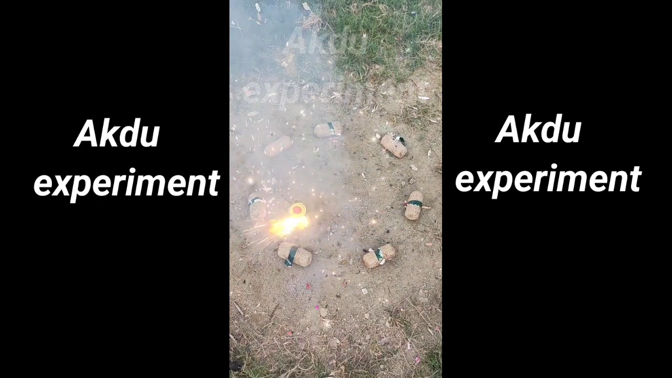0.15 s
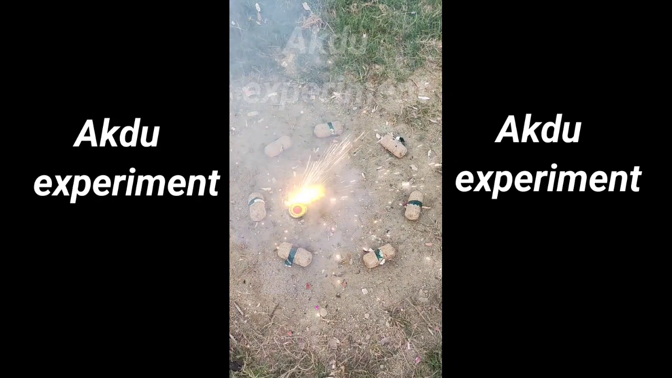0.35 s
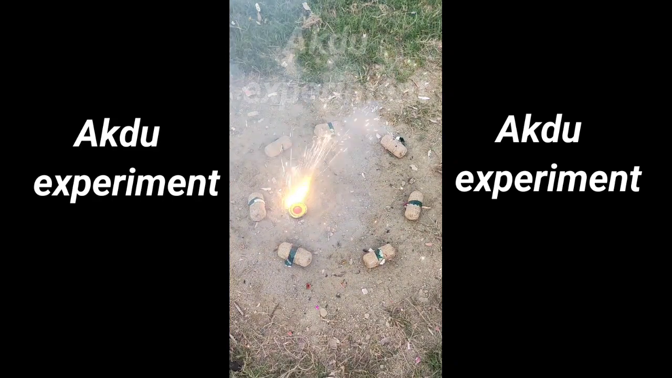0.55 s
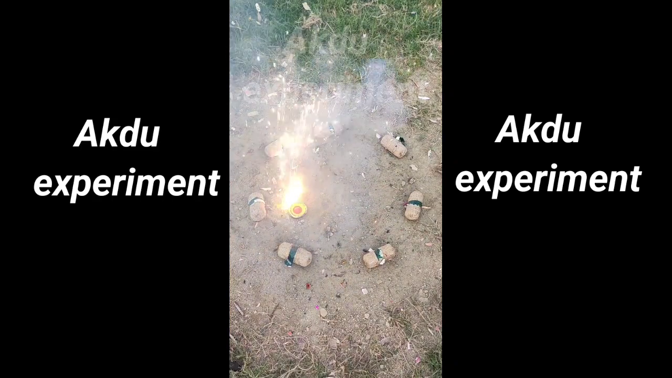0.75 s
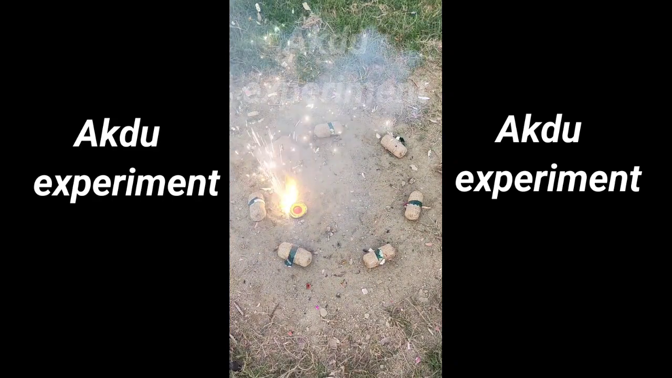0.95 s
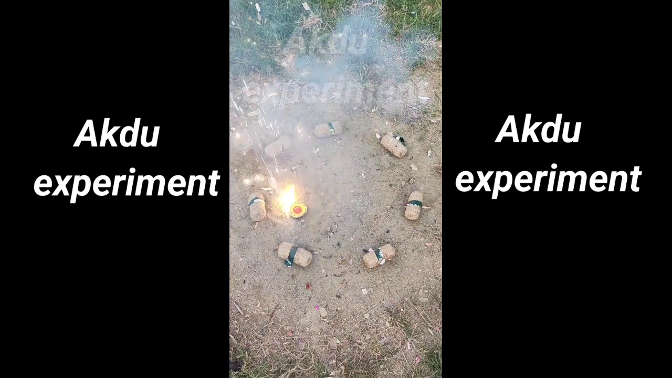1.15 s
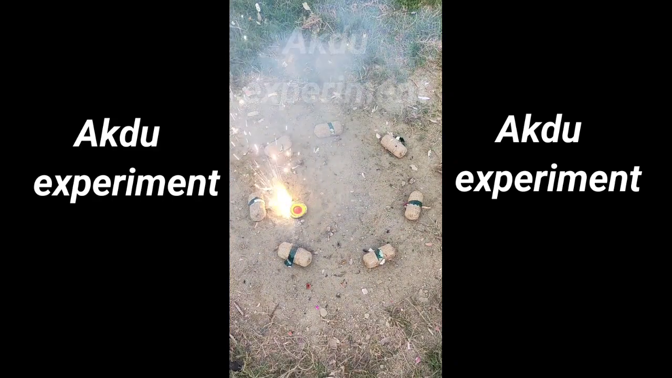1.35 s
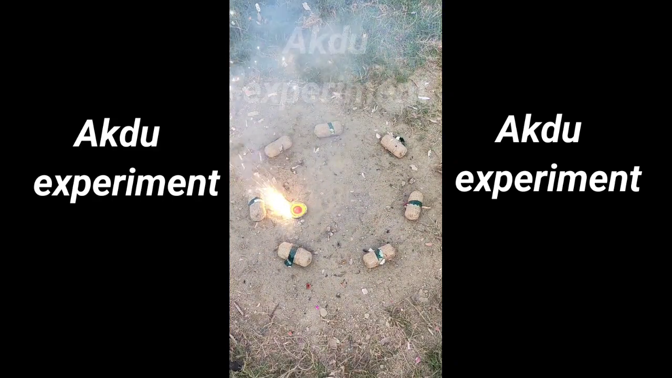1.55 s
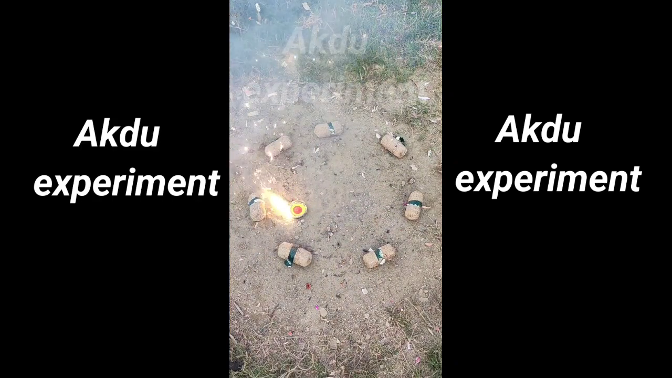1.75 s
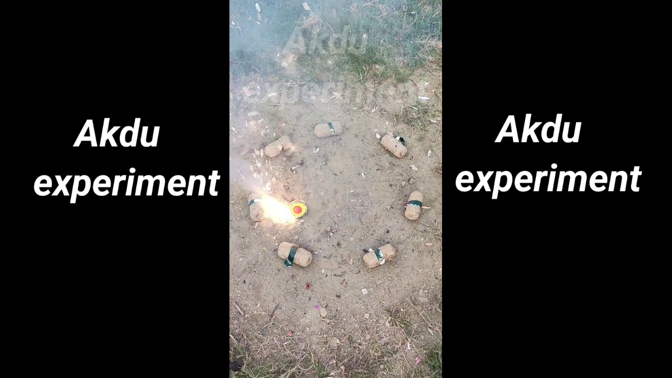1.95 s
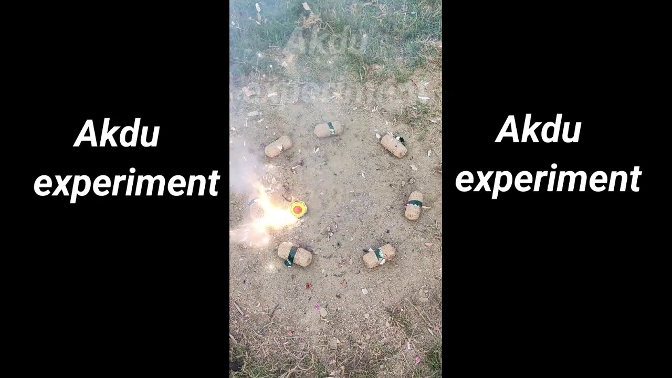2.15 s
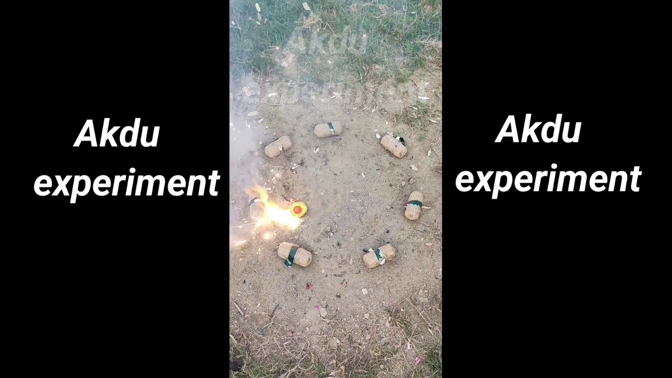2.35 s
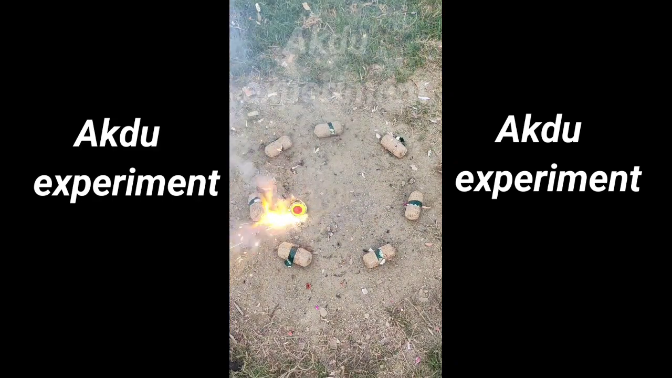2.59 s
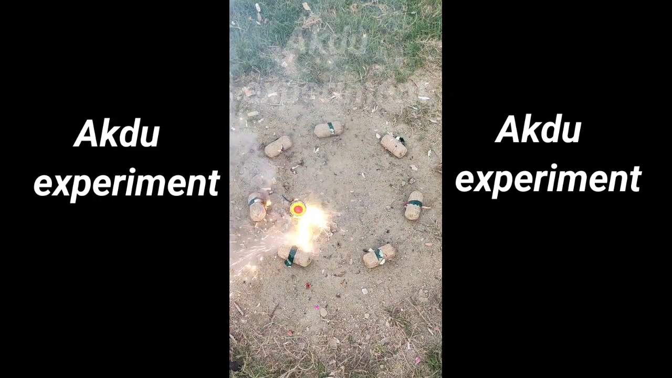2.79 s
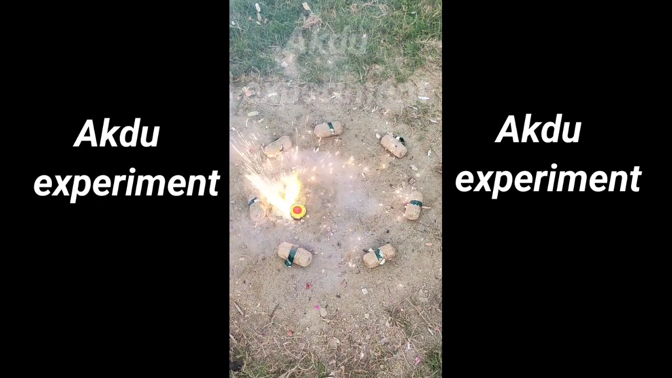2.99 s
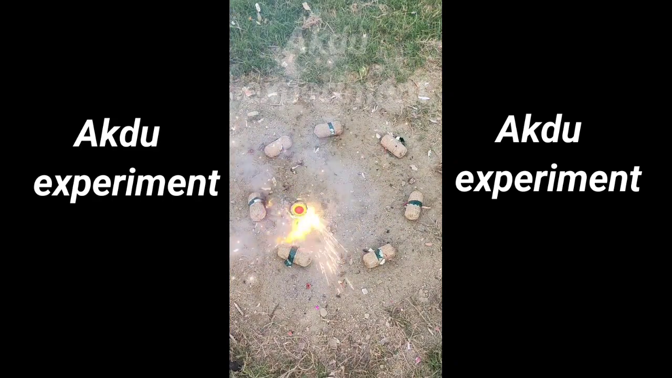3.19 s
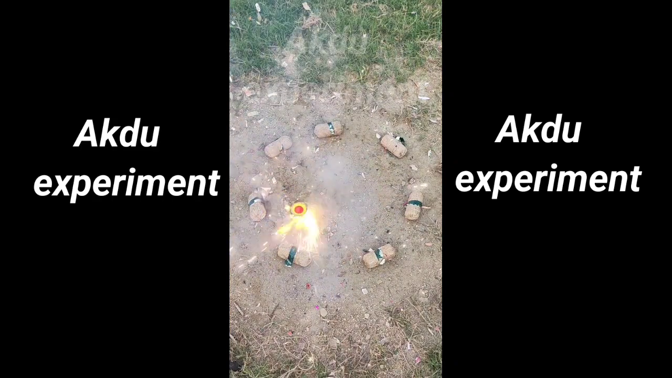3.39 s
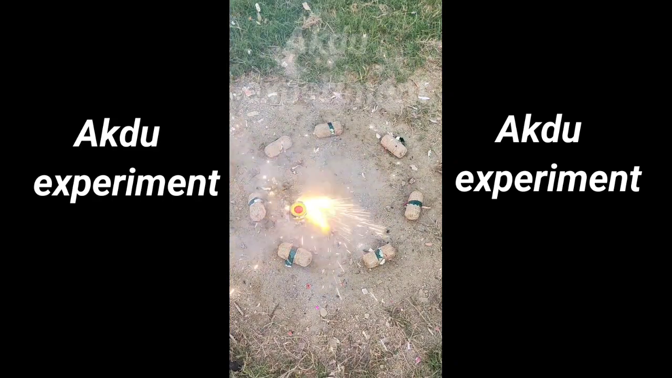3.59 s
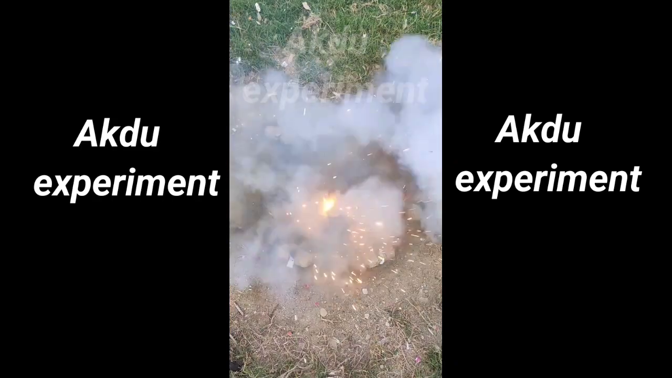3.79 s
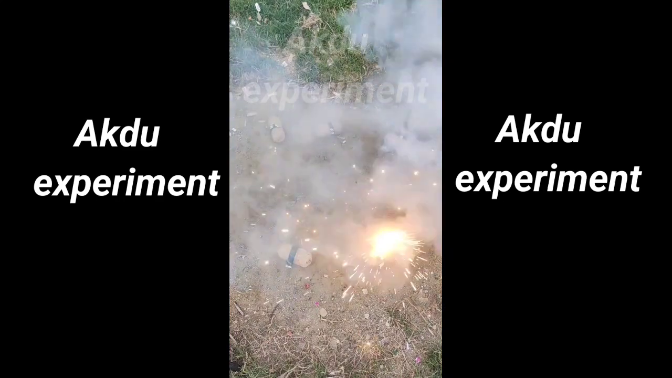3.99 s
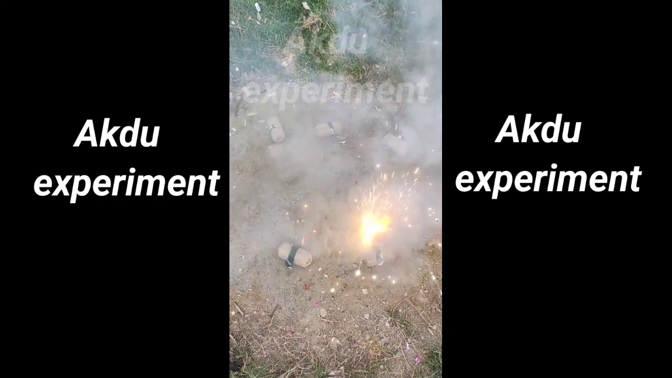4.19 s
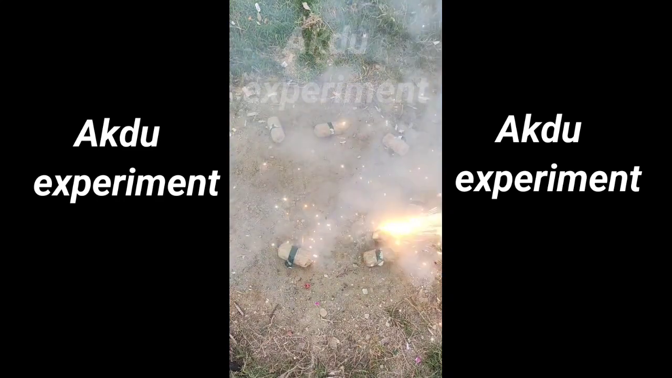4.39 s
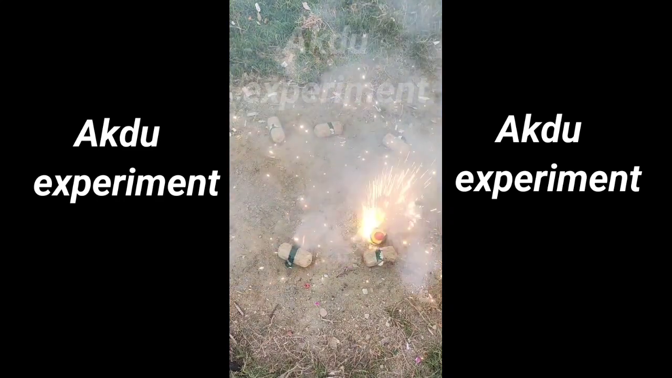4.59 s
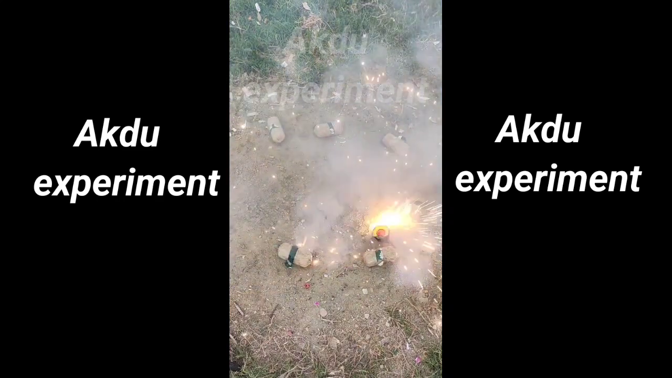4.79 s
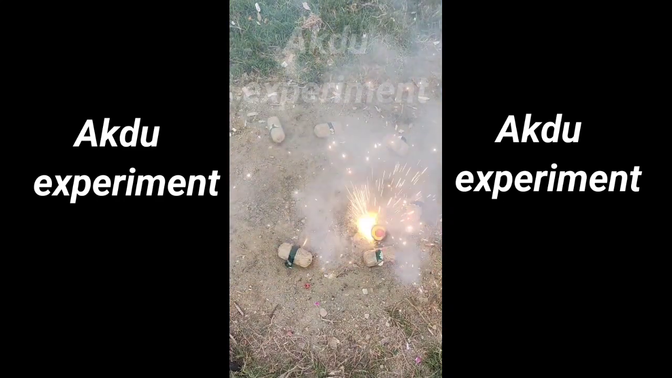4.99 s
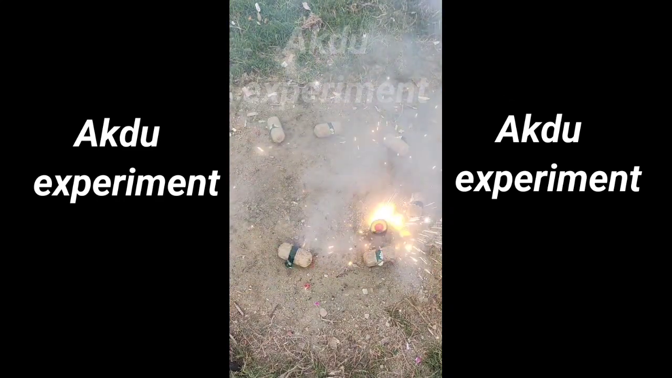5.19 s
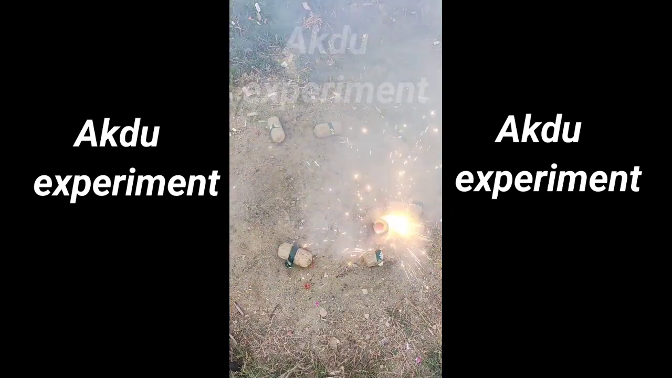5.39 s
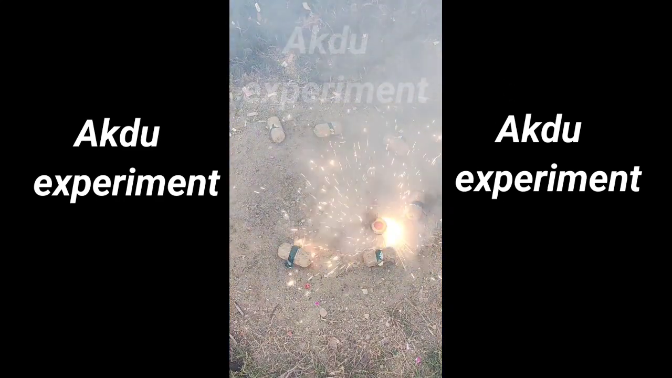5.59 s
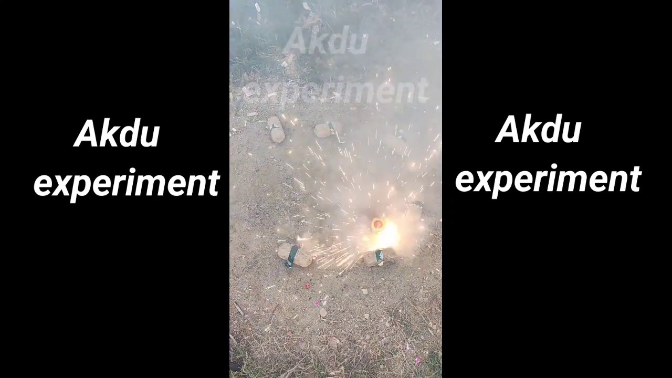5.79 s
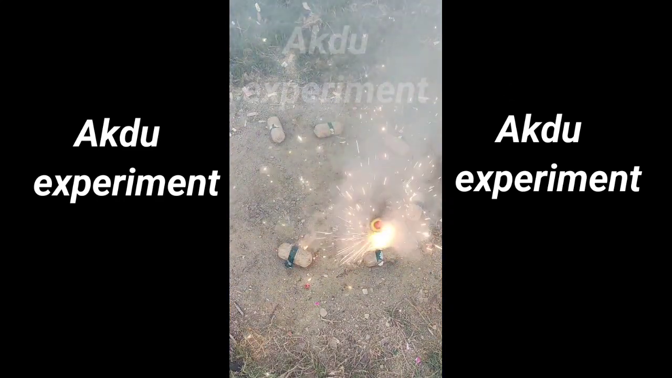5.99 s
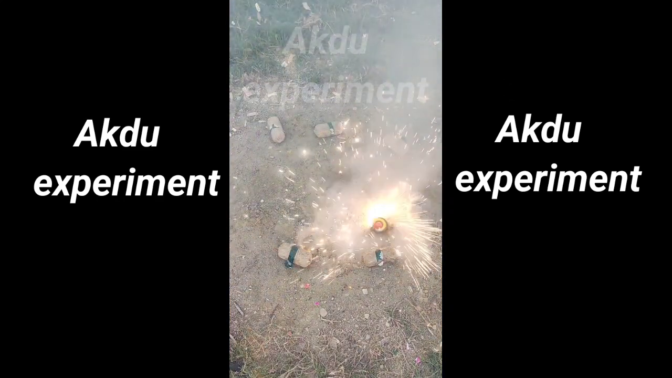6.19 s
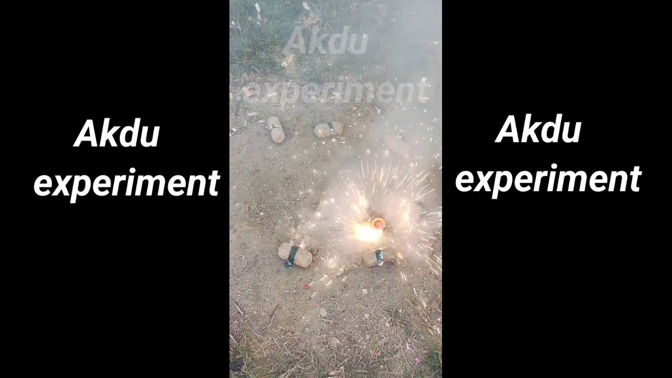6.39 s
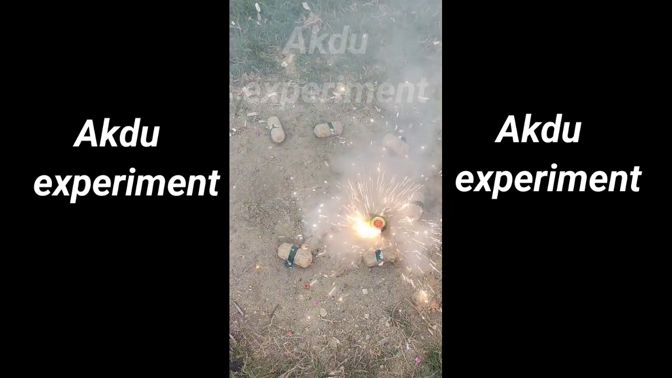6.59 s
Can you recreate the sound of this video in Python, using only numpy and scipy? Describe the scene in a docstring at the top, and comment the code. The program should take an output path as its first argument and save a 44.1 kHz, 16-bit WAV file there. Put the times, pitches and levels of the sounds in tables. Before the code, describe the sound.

Outdoors, a ground firework gives off a continuous fizzing hiss over a low roar, surging and choking as it burns. Suddenly several firecrackers burst almost at once with heavy thumps and cracks, and a short boom echoes off far walls while a wide rush of noise fades. The nearby phone microphone dips in level, so the hiss nearly vanishes before returning with a fast spinning pulse and little spits.

```python
"""On open ground, a small firework roars, hisses and spits sparks a few steps from a phone.
Its flame sets off the firecrackers lying around it: they burst almost together and boom away, thudding
back from distant walls, while a wide rushing hiss swells and dies. The blasts set the firework spinning.
The phone overloads and turns itself down, so the jet vanishes and then swells back."""
import sys
import numpy as np
from scipy import signal
from scipy.fft import rfft, irfft, next_fast_len
from scipy.io import wavfile
from scipy.ndimage import uniform_filter1d, minimum_filter1d, map_coordinates

SR = 44100
rng = np.random.default_rng(int(sys.argv[2]) if len(sys.argv) > 2 else 0)


def inscribe(sig):
    """Save sig as 16-bit PCM at rate SR to the path in sys.argv[1].

    A 1-D sig is mono; a 2-D sig holds one channel per row.
    Samples are clipped to [-1, 1] before scaling.
    """
    pcm = np.round(np.clip(np.atleast_2d(sig).T, -1, 1) * 32767)
    wavfile.write(sys.argv[1], SR, pcm.astype(np.int16))


N = 293265

# The tone of the jet's three layers. Each row: frequency in Hz, relative level in dB.
ROAR_TONE = [(20, -50), (45, -48), (75, -17), (125, -6.5), (200, -2.5), (320, 1.8), (420, 2), (560, -0.5),
             (1100, -2), (1600, -5), (2600, -8.5), (6000, -67)]
HISS_TONE = [(600, -25.5), (1200, -5.5), (1700, -2.5), (2300, -2), (2700, 2), (3150, -1.2), (3700, 0),
             (4500, -10), (6000, -16), (12000, -74)]
FIZZ_TONE = [(2500, -39), (4000, 1.5), (5000, -0.5), (6000, -1.5), (6900, 2), (7700, -1), (9500, -0.5),
             (12000, -5.5), (14500, -9.5), (15500, -28)]
# How hard the powder burns. Each row: time in seconds, base level of hiss in dB, of roar in dB.
BURN_LEVELS = [(0, -30, -30), (0.55, -31, -30), (1.1, -29, -28.5), (1.85, -29.5, -29), (2.2, -27.5, -30),
               (2.4, -28, -30), (3.02, -31, -28), (3.5, -29.5, -30), (3.62, -28, -28), (4.35, -27, -29),
               (4.7, -30, -30.5), (4.85, -28, -27.5), (5.2, -29, -28.5), (5.42, -28.5, -27.5),
               (6.0, -28, -30.5), (6.45, -26, -29.5), (6.65, -26, -30.5)]
# The jet flares up. Each row: start and length in seconds, then boosts in dB for hiss, roar and fizz.
FLARES = [(0.2, 0.053, 4, 1.5, -0.5), (0.24, 0.082, 5.5, -1, 11), (0.33, 0.088, 4.5, -1, 5.5),
          (1.44, 0.18, 0, 1.5, -1), (1.57, 0.15, 3, 2, 4.5), (2.08, 0.22, 1, -0.5, 3.5),
          (2.61, 0.16, 5.5, 3, 7.5), (2.86, 0.043, 2, -1.5, 5), (3.135, 0.16, 4.5, -2, 5),
          (3.215, 0.066, 4, 2, 5.5), (3.38, 0.067, 6.5, -2, 11), (4.25, 0.036, 10, 5.5, 6.5),
          (4.4, 0.07, 4.5, 1, 3.5), (5.73, 0.063, 3, 1, 5.5), (6.5, 0.072, 3.5, 0, 3.5)]
# The jet chokes or is knocked aside. Each row: start and length in seconds, hiss and roar loss in dB.
CHOKES = [(0.775, 0.04, 6.5, 6), (1.21, 0.1, 4.5, 0.5), (1.44, 0.075, 2, 0), (2.46, 0.13, 2, 2.5),
          (4.1, 0.22, 6, -1.5), (4.655, 0.015, 1.5, 0)]
# Lumps of powder spit out. Each row: start and length in seconds, boost for hiss and fizz in dB.
SPITS = [(2.403, 0.008, 3.5), (4.568, 0.011, 2), (5.142, 0.016, 1.5), (5.258, 0.017, 2.5),
         (5.383, 0.014, 3), (5.447, 0.008, 4), (5.498, 0.006, 2), (5.52, 0.015, 3.5), (5.577, 0.006, 4),
         (5.669, 0.012, 3), (5.724, 0.014, 3), (5.857, 0.025, 4.5), (5.928, 0.012, 3), (5.96, 0.008, 2),
         (6.155, 0.011, 3), (6.181, 0.014, 4), (6.34, 0.01, 0.5), (6.392, 0.008, 4), (6.546, 0.01, 2)]
# How fast the firework spins. Each row: time in seconds, turns per second.
SPIN_SPEED = [(4.7, 12.1), (5.2, 7.65), (5.48, 10.3), (5.95, 10.2), (6.4, 7.9)]

# The firecrackers. Each row: start in seconds, strength in dB, thump pitch in Hz, crack boost in dB.
BLASTS = [(3.7337, 14.5, 244, -4), (3.742, -1, 272, 6.5), (3.750, 13.5, 294, -28), (3.767, 16, 281, -16),
          (3.776, 11.5, 282, -10), (3.807, 18.5, 275, -12.5), (3.839, 16, 215, -13), (3.851, 13.5, 215, -7),
          (3.861, 10, 212, -10.5), (3.889, 18.5, 181, -13), (3.911, 11.5, 155, -5), (3.929, 6, 187, -12),
          (3.937, 8.5, 187, -12), (3.968, 13, 167, -17)]
# The tone of a casing cracking, then tearing. Each row: frequency in Hz, relative level in dB.
CRACK_TONE = [(300, 6), (800, 2), (1300, 1), (2000, -11), (3200, -16), (5000, -32), (14000, -27)]
TEAR_TONE = [(250, -11), (600, 1.5), (1100, -3), (1800, -7), (3200, -15), (6000, -32), (14000, -35)]
# The tone of a blast's echo. Each row: multiple of the thump's pitch, relative level in dB.
ECHO_TONE = [(.1, -28), (.22, -31), (.35, -18), (.52, -3), (.8, -1), (1.3, -0.5), (1.8, -6), (2.5, -19),
             (4.4, -33), (10, -30.5), (20, -43.5), (36, -46.5), (56, -56)]
# How long the echo lasts. Each row: frequency in Hz, seconds to fade by 60 dB.
ECHO_FADE = [(40, 0.15), (80, 0.23), (120, 0.64), (195, 0.7), (300, 0.62), (500, 0.52), (1000, 0.47),
             (10000, 0.4)]
# How wide the echo sounds. Each row: frequency in Hz, width from 0 (centre) to 1 (all around).
ECHO_WIDTH = [(130, 0.11), (300, 0.35), (650, 0.63), (1400, 1)]
# Thuds coming back from distant walls. Each row: start in seconds, peak level in dB.
WALL_THUDS = [(4.0, 11), (4.03, 10.5), (4.075, 4.5), (4.165, -1), (4.21, -4), (4.275, -12), (4.408, -14)]
# The tone of those thuds, of a mid-pitched rushing hiss and of the spray of burning powder.
# Each row: frequency in Hz, relative level in dB.
THUD_TONE = [(60, -35), (125, -5), (200, 1.5), (310, -2.5), (480, -20), (900, -56)]
MID_RUSH_TONE = [(300, -19), (900, -17), (1300, -2), (1750, -0.5), (2600, -4), (3600, -12.5), (6000, -29),
                 (14000, -43)]
SPRAY_TONE = [(3000, -25), (5500, 2), (8000, -8), (10000, 2), (14000, -1)]

# How alike the jet is at the phone's two microphones. Each row: frequency in Hz, likeness (1 = same).
MIC_LIKENESS = [(100, 1), (600, 0.99), (2000, 1), (3300, 0.82), (4150, 1), (4400, 1), (5200, 0.38),
                (6900, 0.69), (7800, 0.44), (8700, 1), (9700, 0.82), (12000, 0.17), (14500, 0.63)]
# How much louder the left microphone is. Each row: frequency in Hz, left minus right in dB.
MIC_BALANCE = [(2100, 0), (3100, -5.5), (4400, -2.5), (4950, 6), (6500, -0.5), (11000, -0.5)]
# How far the right microphone lags. Each row: frequency in Hz, lag in radians.
MIC_LAG = [(2760, 0), (3600, 1.5), (4220, 2.5), (4600, 3.5), (5400, 5.5), (7000, 6), (10200, 6.3),
           (11200, 7), (13000, 12), (15200, 12.7)]


def firework_jet():
    """Burning powder makes a low roar and a sputtering hiss, and burning metal grains fizz."""
    roar_db, hiss_db, fizz_db = jet_levels()
    sputter = wobble(60)  # the powder burns unevenly
    sparks = crackle(count=6000, spread_db=2.5, life_s=0.00056)
    glitter = crackle(count=2400, spread_db=-1.0, life_s=0.00074)  # the finest grains
    roar = amp(roar_db + 0.31 * sputter) * gas_rush(ROAR_TONE, amp(-12) * sparks, drift_db=1.28)
    hiss = amp(hiss_db + 0.7 * sputter) * gas_rush(HISS_TONE, amp(-9.5) * sparks, drift_db=1.53)
    fizz_gain = amp(fizz_db + 0.56 * sputter + 1.2 * wobble(26))
    fizz = fizz_gain * gas_rush(FIZZ_TONE, amp(-9.0) * glitter, drift_db=2.1)
    return filtered(roar + hiss + fizz, microphone_pair)


def jet_levels():
    """The levels of roar, hiss and fizz in dB, as the jet burns, flares, chokes, spits and spins."""
    hiss_burn, roar_burn = curves(BURN_LEVELS)
    hiss_flare, roar_flare, fizz_flare = swells(FLARES, rise_s=0.038, fall_s=0.05)
    hiss_choke, roar_choke = swells(CHOKES, rise_s=0.026, fall_s=0.19)
    spit, = swells(SPITS, rise_s=0.004, fall_s=0.009)
    swing = spin() - hiss_choke
    roar_db = roar_burn + roar_flare - roar_choke
    hiss_db = hiss_burn + spit + hiss_flare + swing
    fizz_db = hiss_burn + spit - 6.5 + fizz_flare + 1.18 * swing  # quieter than the hiss, swings wider
    return roar_db, hiss_db, fizz_db


def spin(first_sweep_s=4.49, fade_s=0.95, narrowness=0.64):
    """A fading swing in dB: kicked by the blasts, the jet points at the listener once a turn."""
    speed, = curves(SPIN_SPEED)
    age = np.arange(N) / SR - first_sweep_s
    turns = np.cumsum(speed) / SR
    turns -= np.interp(0, age, turns)  # count from the first sweep
    facing = np.cos(2 * np.pi * turns) + narrowness * np.cos(4 * np.pi * turns)
    fade_in = np.clip(1 + 2 * turns, 0, 1)
    return fade_in * np.exp(-np.abs(age) / fade_s) * facing


def gas_rush(tone, grains, drift_db):
    """Swirling gas with crackling grains in it, given a tone and spread over left and right."""
    def response(hz):
        angle = np.arccos(np.clip(along(MIC_LIKENESS, hz), -1, 1)) / 2
        return amp(along(tone, hz)) * [np.cos(angle), np.sin(angle)]
    mid, side = filtered(nozzle_noise(drift_db) + grains, response)
    return unit(np.array([mid + side, mid - side]))


def nozzle_noise(drift_db):
    """Stereo noise whose tone drifts in patches as the nozzle turns and clogs."""
    spectra = signal.stft(rng.standard_normal((2, N)), nperseg=1024)[2]
    patches = uniform_filter1d(rng.standard_normal(spectra.shape[1:]), size=7, axis=0)  # blur in pitch
    patches = uniform_filter1d(patches, size=12, axis=1)  # blur in time
    noise = signal.istft(spectra * amp(drift_db * unit(patches)), nperseg=1024)[1]
    return unit(noise[:, :N])


def firecrackers():
    """Each burst is a short heavy thump, a crack, the tearing of its casing and a rolling echo."""
    bursts, echoes = np.zeros((2, N)), np.zeros((2, N))
    t = np.arange(SR // 8) / SR
    age = t / 0.0018  # time in lengths of the pressure wave
    push = -(1 - age) * np.exp(-age) * (1 - np.exp(-t / 0.00096))  # the wave and its rebound
    for start, db, hz, crack_db in BLASTS:
        thump = -np.sin(2 * np.pi * hz * t) * (1 - np.exp(-t / 0.0022)) * amp(-60 * t / 0.016)
        noise = with_tone(rng.standard_normal((2, len(t))), CRACK_TONE)
        crack = unit(noise) * hump(age)
        add(bursts, start, amp(db) * (amp(10.5) * thump + amp(-5) * push + amp(crack_db) * crack))
        add(bursts, start + 0.00197, amp(db - 7.5) * tearing_casing(len(t)))
        add(echoes, start, amp(db - 8) * rolling_echo(hz))
    clumps = amp(2.5 * wobble(70))  # the echo arrives unevenly
    return bursts + clumps * echoes


def tearing_casing(samples, count=7, spread_db=6.5, life_s=0.012):
    """A casing rips in a quick, ragged run of snaps."""
    delays, sizes = rng.exponential(size=(count, 2)).T
    moments = np.minimum(delays * life_s * SR, samples - 1).astype(int)
    snaps = amp(spread_db * np.minimum(sizes, 2)) * rng.choice([-1, 1], count)
    rip = with_tone(np.bincount(moments, snaps, samples), TEAR_TONE)
    return rip / np.abs(rip).max()


def rolling_echo(thump_hz, rise_s=0.024):
    """Ground, trees and walls scatter a blast into a boom that outlasts its high notes."""
    def response(hz):
        tone = np.multiply(ECHO_TONE, [thump_hz, 1])
        return amp(along(tone, hz)) * [np.ones_like(hz), along(ECHO_WIDTH, hz)]
    bands_hz, t, spectra = signal.stft(rng.standard_normal((2, SR + SR // 2)), SR, nperseg=1024)
    fade = amp(-60 * t / along(ECHO_FADE, bands_hz)[:, None])
    tail = signal.istft(spectra * fade, SR, nperseg=1024)[1]
    mid, side = filtered(tail, response)
    echo = np.array([mid + side, mid - side])
    fade_in = 1 - np.exp(-np.arange(len(mid)) / SR / rise_s)
    return echo / np.std(echo[:, :SR // 10]) * fade_in


def distant_walls(swell_s=0.012):
    """Distant walls throw the bang back as short dull thuds."""
    thuds, t = np.zeros((2, N)), np.arange(SR // 5) / SR
    for start, db in WALL_THUDS:
        thud = with_tone(rng.standard_normal(len(t)), THUD_TONE) * hump(t / swell_s) ** 2
        add(thuds, start, amp(db) * thud / np.abs(thud).max())
    return thuds


def swelling_hiss(tone, start_s, swell_s, db):
    """A wide rushing hiss that swells with the blasts and dies away."""
    age = np.maximum(np.arange(N) / SR - start_s, 0) / swell_s
    hiss = with_tone(crackle(count=10000, spread_db=0.5, life_s=0.0012), tone)
    return amp(db) * hump(age) ** 2 * unit(hiss)


def crackle(count, spread_db, life_s):
    """Tiny bursts of noise with random sizes, at random moments."""
    sizes = amp(spread_db * np.minimum(rng.exponential(size=count), 4))
    power = np.bincount(rng.integers(0, N, count), sizes ** 2, N)
    return unit(np.sqrt(smooth(power, life_s)) * rng.standard_normal((2, N)))


def microphone_pair(hz):
    """The two microphone openings differ in tone; the right slips a cycle behind at each resonance."""
    lean = amp(along(MIC_BALANCE, hz) / 2)
    return np.array([lean, np.exp(-1j * along(MIC_LAG, hz)) / lean])


def automatic_volume(x, limit_db, hold_s, recover_db_per_s):
    """The volume drops within milliseconds of a loud sound, stays down a moment, then creeps back."""
    level = np.sqrt(smooth(np.mean(x ** 2, axis=0), 0.0066))
    excess_db = np.maximum(20 * np.log10(level + 1e-9) - limit_db, 0)
    half_hold = int(hold_s * SR / 2)
    held_db = minimum_filter1d(-excess_db, 2 * half_hold + 1, origin=half_hold)
    ramp_db = recover_db_per_s * np.arange(N) / SR
    gain_db = np.minimum.accumulate(held_db - ramp_db) + ramp_db
    return x * amp(smooth(gain_db, 0.00038))


def amp(db):
    """Turn dB into a number to multiply by."""
    return 10 ** (np.asarray(db) / 20)


def unit(x):
    """Scale x to an average (rms) level of 1."""
    return x / np.sqrt(np.mean(x ** 2) + 1e-20)


def along(table, hz):
    """Read a table between its rows, on a log frequency scale."""
    row_hz, values = np.transpose(table)
    return np.interp(np.log(hz + 1), np.log(row_hz + 1), values)


def curves(table):
    """One value per sample for each column after the time."""
    times, *columns = np.transpose(table)
    return [np.interp(np.arange(N) / SR, times, column) for column in columns]


def swells(events, rise_s, fall_s):
    """One curve per dB column: each event rises, holds until its length is up, then falls away."""
    t, total = np.arange(N) / SR, 0
    for start, length, *sizes_db in events:
        rising, falling = (t - start) / rise_s, 1 - (t - start - length) / fall_s
        total += np.outer(sizes_db, np.clip(np.minimum(rising, falling), 0, 1))
    return total


def hump(age):
    """A curve that climbs to 1 at age 1, then dies away."""
    return age * np.exp(1 - age)


def wobble(rate):
    """A smooth curve through random points, rate of them a second."""
    points = rng.standard_normal(int(N * rate / SR) + 4)
    return map_coordinates(points, [np.arange(N) * rate / SR])


def smooth(x, seconds):
    """A running average that gradually forgets the past."""
    keep = np.exp(-1 / (seconds * SR))
    return signal.lfilter([1 - keep], [1, -keep], x)


def filtered(x, response):
    """Multiply each frequency in x by response(hz)."""
    size = x.shape[-1]
    padded = next_fast_len(size + SR // 2)
    return irfft(rfft(x, padded) * response(np.fft.rfftfreq(padded, 1 / SR)), padded)[..., :size]


def with_tone(x, tone):
    """Shape x with a tone table."""
    return filtered(x, lambda hz: amp(along(tone, hz)))


def add(track, start_s, sound):
    """Mix a sound into a track."""
    part = track[..., round(start_s * SR):][..., :sound.shape[-1]]
    part += sound[..., :part.shape[-1]]


def scene():
    """The jet and blasts close by, thuds from afar, a mid-pitched rush and a spray of burning powder."""
    mid_rush = swelling_hiss(MID_RUSH_TONE, start_s=BLASTS[0][0], swell_s=0.19, db=-9.5)
    spray = swelling_hiss(SPRAY_TONE, start_s=3.758, swell_s=0.036, db=-12.5)
    return firework_jet() + firecrackers() + distant_walls() + mid_rush + spray


def record(dry):
    """The phone turns the blasts down, squashes the remaining peaks and cuts the highest frequencies."""
    ceiling, top_hz = 0.92, 15250
    turned_down = automatic_volume(dry, limit_db=-2.0, hold_s=0.15, recover_db_per_s=44.5)
    squashed = turned_down / (1 + np.abs(turned_down / ceiling) ** 4) ** (1 / 4)
    return filtered(squashed, lambda hz: hz < top_hz)


dry = scene()
out = record(dry)
inscribe(out)
```